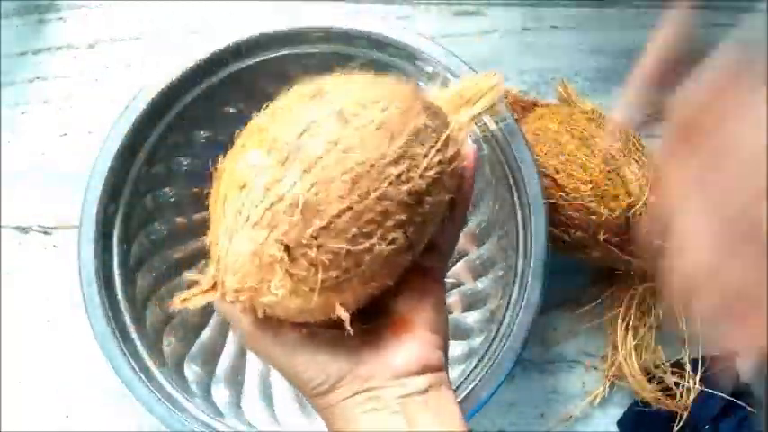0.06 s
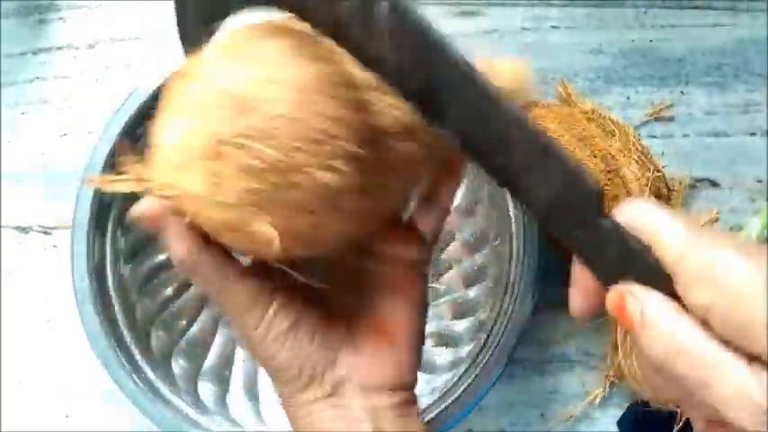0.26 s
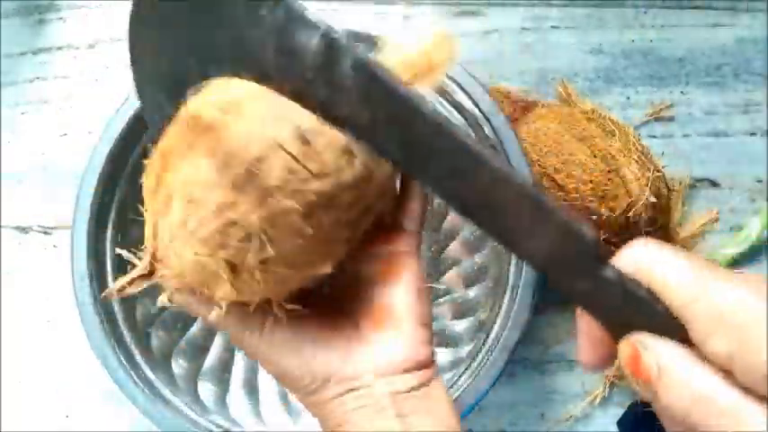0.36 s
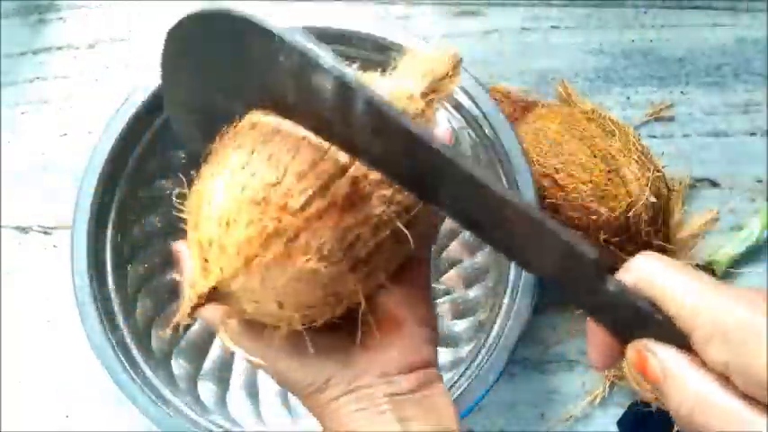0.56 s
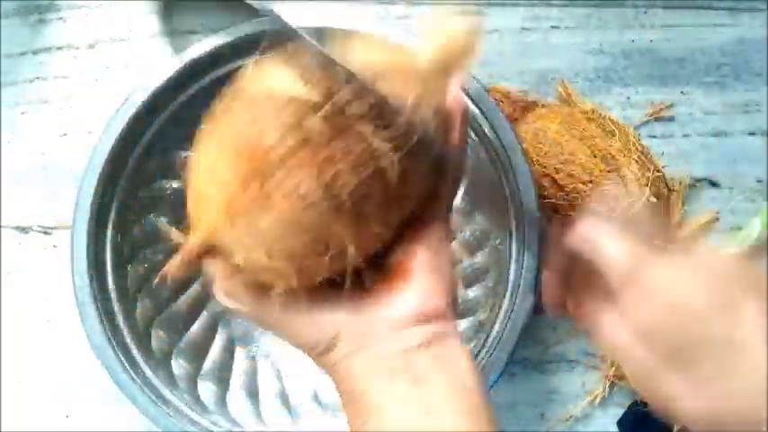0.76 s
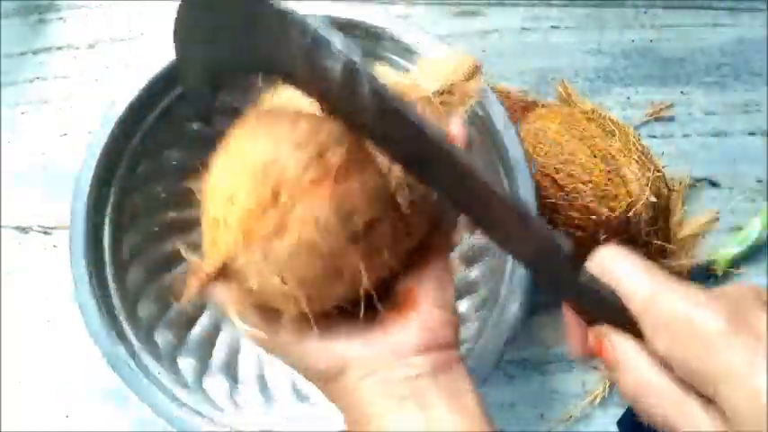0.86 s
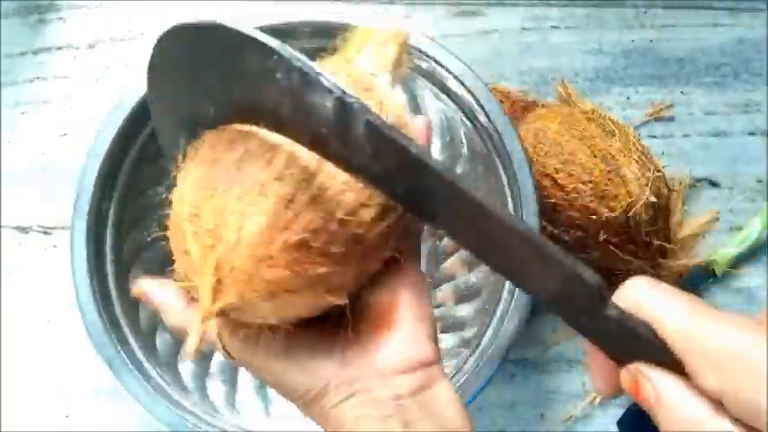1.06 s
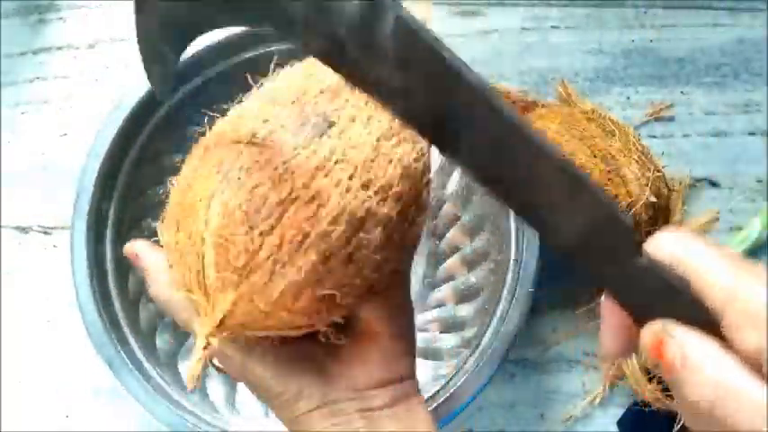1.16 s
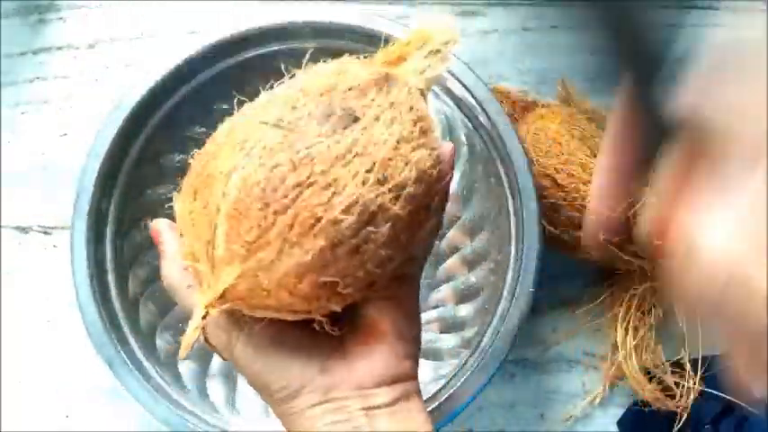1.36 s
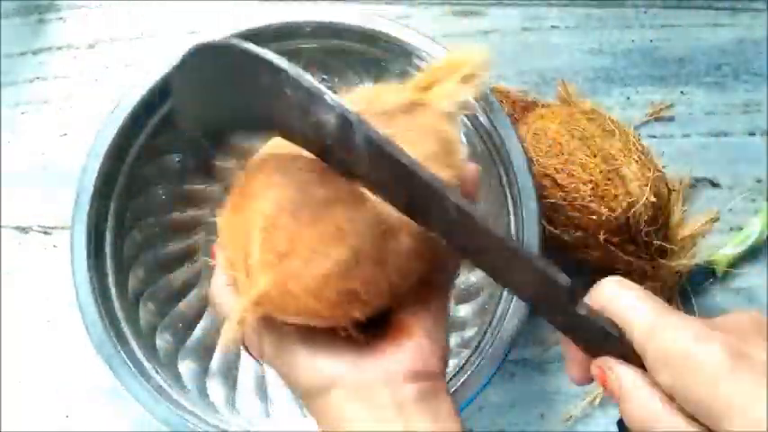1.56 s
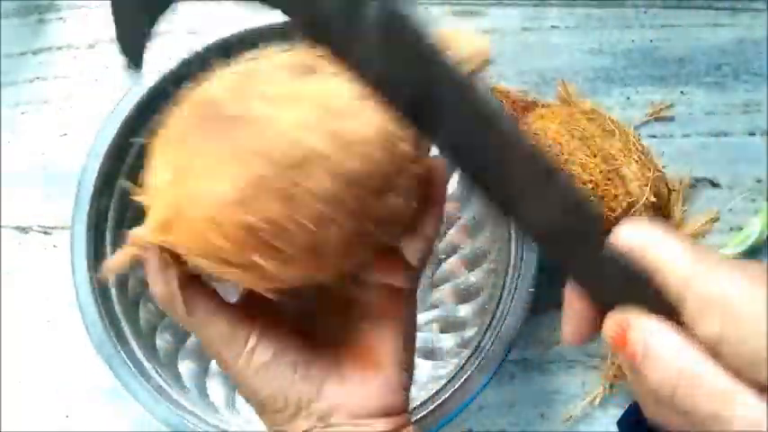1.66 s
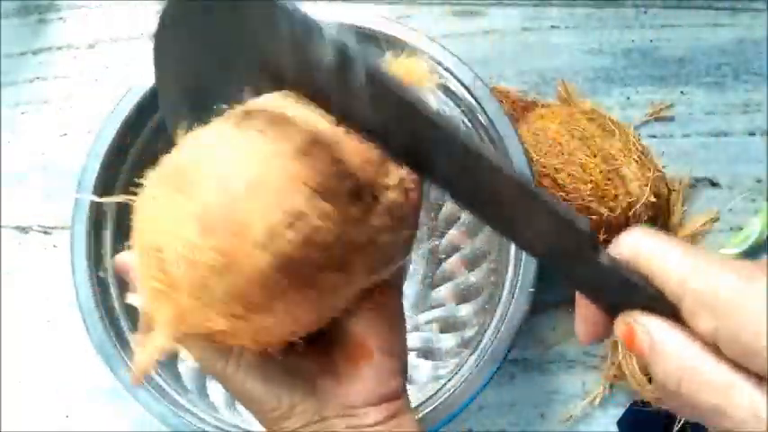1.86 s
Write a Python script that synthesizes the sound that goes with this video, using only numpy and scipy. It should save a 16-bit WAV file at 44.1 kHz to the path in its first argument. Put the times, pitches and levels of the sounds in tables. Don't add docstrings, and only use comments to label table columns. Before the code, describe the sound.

A heavy steel blade hits a hand-held coconut three times, each a sharp crack with a dull thump; the first two bounce, chatter and squeal, then ring, close microphone in a bare, lively room.

```python
import sys
import numpy as np
from scipy import signal
from scipy.fft import rfft, irfft
from scipy.io import wavfile
from scipy.ndimage import uniform_filter1d

SR = 44100
rng = np.random.default_rng(int(sys.argv[2]) if len(sys.argv) > 2 else 0)


def pcm_store(signal):
    levels = np.round(np.clip(np.atleast_2d(signal), -1, 1) * 32767)
    wavfile.write(sys.argv[1], SR, levels.astype(np.int16).T)


def undo_db(level):
    steps = np.asarray(level, float) / 20
    return 10 ** steps


N = 83790
T = np.arange(N) / SR

# t/s, level/dB, steady share/0-1
HUM = [(0, -68.5, .1), (0.188, -65.5, 0.44), (.4, -61, 0.2), (.7, -67.5, 0), (.88, -62, 0.6),
       (1.0, -58.5, 0), (1.2, -59, 0.07), (1.36, -55, 0.69), (1.6, -49.5, 0.83), (1.702, -55.5, 0.6),
       (1.9, -52, 0.63)]
# f/Hz, density/dB
FLOOR = [(25, -8), (60, -24), (95, -28), (130, -3), (260, -2.5), (450, -18.5), (900, -39), (16000, -51)]
# f/Hz, t60/s, level/dB
ROOM = [(140, 0.15, 4), (430, 0.33, 2.5), (1017, 0.27, 1), (2340, 0.31, -3), (6000, 0.27, -2.5),
        (11800, 0.2, 0)]
# t/s, length/s, level/dB, lowest f/Hz
RUSTLES = [
    (0.63, 0.014, -74, 8900),
    (0.655, 0.013, -65.5, 6000),
]
# t/s, level/dB, low f/Hz, high f/Hz, high level/dB
TAPS = [
    (.001, -49, 1200, 3200, -2),
    (.018, -52, 1400, 3220, 1),
    (1.405, -44, 1480, 650, -10),
    (1.8925, -43, 850, 1300, -5),
]
TAP_CLICK_DB = [-14, -22.5, -15, -4]
# t/s, level/dB
LIFTS = [
    (.30, -47),
    (1.076, -46),
]
FREE_HZ = [581, 1695, 2290, 2622, 2762, 4105, 5628, 6022, 7140, 7488, 8823, 5000, 3246, 9308]
# t60/s, level after lift 1/dB, level after lift 2/dB
FREE_MODES = [(2.4, -8, -20), (1.77, -6, -1.5), (.6, -7, -48), (1.6, -19.5, -33), (0.79, -2, -2),
              (0.44, 3.5, -1), (0.74, -10.5, -19.5), (1.1, -55, -14.5), (0.46, -6, 2.5),
              (0.66, -10.5, -18.5), (.4, -41, -46), (0.92, -10.5, -13.5), (0.74, -30, -13),
              (0.39, -26, -21)]
CHOKE_DB = [-13, 2]
# t/s, length/s
SQUEAL_TIMES = [
    (.284, .017),
    (.306, .031),
    (.985, .043),
    (1.037, .023),
    (1.070, .008),
    (1.085, .026),
]
# f/Hz, level/dB
SQUEAL_TONES = [(1606, -31), (1603, -27), (1611, -35), (1611, -26), (1575, -43), (1588, -28)]
# t/s, knock level/dB, chatter level/dB, chatter length/s, f of mode nearest the contact/Hz
BOUNCES = [
    (0.283, -23, -24.5, 0.018, 7200),
    (.300, -39.5, -30.5, 0.049, 6490),
    (0.9781, -37, -52.5, 0.0027, 2975),
    (.9808, -24, -28.5, 0.046, 5375),
    (1.024, -41, -27.5, 0.028, 5000),
    (1.0698, -23, -26, 0.032, 5958),
]
LOADED_HZ = [1582, 1641, 1300, 2580, 2975, 4840, 5375, 5958, 6490, 7200, 8300, 9090, 10300, 11900]
# bandwidth/Hz, level/dB
LOADED_MODES = [(30.6, -2), (29.4, -6.5), (150, 4), (40.7, -3.5), (56, -2.5), (60, -6.5), (50.3, -4),
                (40, -6), (130, -14.5), (79.7, -10.5), (160, -25.5), (87, -5), (100, -9), (114, -11)]
# f/Hz, level/dB
SCRAPE = [(200, -5), (800, 4), (3000, 3), (3750, -16.5), (4700, 1.5), (14000, -3)]
# t/s, crack level/dB, thump f/Hz, thump level/dB, shell ring level/dB
BLOWS = [
    (.2098, -15, 330, -13.5, -35),
    (0.8947, -16.5, 486, -10.5, -41),
    (1.6373, -15.5, 310, -10, -49),
]
# f/Hz, density/dB
CRACK = [
    [(290, -37), (500, -10.5), (1770, 2), (3290, -6), (7000, -0.5), (14500, -8.5), (16000, -19.5)],
    [(290, -13), (500, -4), (1740, -3), (4150, -4), (5630, -10.5), (13400, -6.5), (16000, -18.5)],
    [(290, -17.5), (500, -11), (4470, -2.5), (7750, -6), (9770, -7.5), (12900, -10), (16000, -17.5)],
]
# f/Hz, t60/s, level/dB
SHELL = [(1050, 0.13, 4.5), (1263, 0.12, 7.5), (1713, 0.031, -14)]
THUMP_OVERTONE_DB = [-21.5, -32, -5.5]
WET_THUMP_DB = [-27, -7, -24.5]
DUCK_DB = [-10, -8.5, -7]


def noise():
    return rng.standard_normal(N)


def band(x, hz, width_hz):
    return signal.lfilter(*signal.iirpeak(min(hz, .45 * SR), hz / width_hz, fs=SR), x)


def unit(x):
    return x / np.sqrt(np.mean(x ** 2) + 1e-30)


def colour(x, points):
    p = np.array(points, float)
    f = np.fft.rfftfreq(len(x), 1 / SR) + 1
    gain_db = np.interp(np.log(f), np.log(p[:, 0]), p[:, 1])
    return irfft(rfft(x) * undo_db(gain_db), len(x))


def gate(at, hold_s, fade_s, rise_s=0.00017):
    return np.clip((T - at) / rise_s, 0, 1) * np.exp(-np.clip(T - at - hold_s, 0, None) / fade_s)


def ring(at, hz, t60_s):
    t = np.clip(T - at, 0, None)
    return np.sin(2 * np.pi * hz * t) * np.exp(-np.log(1000) * t / t60_s)


def walk(rate_hz):
    k = int(SR / rate_hz)
    return unit(uniform_filter1d(uniform_filter1d(noise(), k), k))


def background():
    hum_hz, upper_hz, sub_hz = 165.5, 347, 36
    t, level_db, share = np.array(HUM).T
    steady = np.clip(np.interp(T, t, share), 0, 1)
    hum = np.sqrt(2) * steady * np.sin(2 * np.pi * hum_hz * T)
    hum += (1 - steady) * unit(band(band(noise(), hum_hz, 60), hum_hz, 42))
    hum += undo_db(-22.5) * steady * unit(band(noise(), upper_hz, 15))
    hum += undo_db(-21) * unit(band(band(noise(), sub_hz, 20), sub_hz, 20))
    floor = undo_db(-76) * unit(colour(noise(), FLOOR))
    return hum * undo_db(np.interp(T, t, level_db)) + floor


def room(x):
    build_s = .008
    t, tail = T[:SR // 2], 0
    for hz, t60_s, db in ROOM:
        edges_hz = [hz / 1.6, min(hz * 1.6, 17000)]
        bandpass = signal.butter(2, edges_hz, "band", fs=SR, output="sos")
        echoes = signal.sosfilt(bandpass, rng.standard_normal(len(t)))
        tail = tail + undo_db(db) * echoes * np.exp(-np.log(1000) * t / t60_s)
    tail = tail * (1 - np.exp(-t / build_s))
    return signal.fftconvolve(x, tail / np.sqrt(np.sum(tail ** 2)))[:N]


def rustles():
    out, fade_s = 0, .022
    for at, hold_s, db, hz in RUSTLES:
        grain_db = 3.4 * np.repeat(rng.standard_normal(N // 100 + 1), 100)[:N]
        fibres = colour(noise() * undo_db(grain_db), [(hz / 2, -30), (hz, 0), (15000, -4)])
        out = out + undo_db(db) * gate(at, hold_s, fade_s, rise_s=0.009) * fibres
    return out


def taps():
    out = 0
    for (at, db, low_hz, high_hz, high_db), click_db in zip(TAPS, TAP_CLICK_DB):
        n = noise()
        wood = unit(band(n, low_hz, low_hz * .4)) + undo_db(high_db) * unit(band(n, high_hz, 180))
        out = out + undo_db(db) * gate(at, 0.001, 0.0047) * (wood + undo_db(click_db) * n)
    return out


def free_ring():
    flutter_db, flutter_hz = 4, 60
    out = undo_db(-79.5) * ring(0, FREE_HZ[1], FREE_MODES[1][0])
    for k, (at, db) in enumerate(LIFTS):
        modes = 0
        for hz, mode in zip(FREE_HZ, FREE_MODES):
            level_db = db + mode[1 + k] + flutter_db * min(hz / 4000, 1) * walk(flutter_hz)
            modes = modes + undo_db(level_db) * ring(at, hz, mode[0])
        out = out + modes * np.where(T < BLOWS[k + 1][0], 1, undo_db(CHOKE_DB[k]))
    return out


def squeal():
    out, swell_s = 0, 0.0045
    for (at, hold_s), (hz, db) in zip(SQUEAL_TIMES, SQUEAL_TONES):
        phase = 2 * np.pi * np.cumsum(hz * (1 + .012 * walk(127))) / SR
        level = undo_db(db + 2 * walk(290))
        out = out + level * gate(at, hold_s, 0.0013, rise_s=min(swell_s, hold_s / 2)) * np.sin(phase)
    return out


def chatter():
    slip_rate_hz, slip_spread_db, contact_db, scrape_db = 5900, 2, 5, -7
    out = 0
    for at, knock_db, db, hold_s, near_hz in BOUNCES:
        size_db = slip_spread_db * np.minimum(rng.exponential(size=N), 2)
        slips = (rng.random(N) < slip_rate_hz / SR) * undo_db(size_db) * rng.choice([-1, 1], N)
        push = undo_db(db) * gate(at, hold_s, 0.0035, rise_s=0.01) * unit(slips)
        push += undo_db(knock_db + 10.5) * gate(at, .001, .0022) * noise()
        for hz, (width_hz, mode_db) in zip(LOADED_HZ, LOADED_MODES):
            near = abs(hz / near_hz - 1) < .06
            gain = undo_db(mode_db + contact_db * near) * np.sqrt(SR / width_hz) / 10
            out = out + gain * band(push, hz, width_hz)
        out = out + undo_db(scrape_db) * colour(push, SCRAPE)
    return out


def cracks():
    husk_db, husk_lead_s = -12, .0012
    out = 0
    for (at, db, _, _, shell_db), spectrum in zip(BLOWS, CRACK):
        husk = undo_db(husk_db) * np.exp(-abs(T - at) / husk_lead_s)
        shape = gate(at, .0012, .0025) + husk
        out = out + undo_db(db) * shape * unit(colour(noise(), spectrum))
        out = out + undo_db(shell_db) * sum(undo_db(d) * ring(at, hz, t60_s) for hz, t60_s, d in SHELL)
    return out


def thumps():
    t60_s, rows = 0.0079, []
    for (at, _, hz, db, _), over_db in zip(BLOWS, THUMP_OVERTONE_DB):
        body = ring(at, hz, t60_s) + undo_db(over_db) * ring(at, hz * 2, t60_s)
        rows.append(-undo_db(db) * body)
    return np.array(rows)


def scene():
    crack, thump, blade, drag = cracks(), thumps(), chatter(), squeal()
    small = taps() + rustles()
    send = undo_db(-1.5) * crack + undo_db(np.array(WET_THUMP_DB)) @ thump
    send = send + undo_db(-5.5) * blade + undo_db(-16.5) * drag + undo_db(-6.5) * small
    near = crack + thump.sum(axis=0) + blade + drag + small + room(send)
    low_cut = signal.butter(2, 146, "high", fs=SR, output="sos")
    return (signal.sosfilt(low_cut, near) + free_ring() + background())[None]


def band_limit(x):
    return signal.sosfilt(signal.butter(12, 16810, fs=SR, output="sos"), x)


def record(dry):
    late_s, attack_s, release_s, ceiling = 0.0084, 0.00067, 0.027, .7
    gain_db = 0
    for blow, dip_db in zip(BLOWS, DUCK_DB):
        t = np.clip(T - blow[0] - late_s, 0, None)
        gain_db = gain_db + dip_db * (1 - np.exp(-t / attack_s)) * np.exp(-t / release_s)
    rounded = ceiling * np.tanh(dry * undo_db(gain_db) / ceiling)
    top_cut = signal.cheby1(8, 1, 16300, fs=SR, output="sos")
    return band_limit(signal.sosfilt(top_cut, rounded))


dry = scene()
out = record(dry)
pcm_store(out)
```